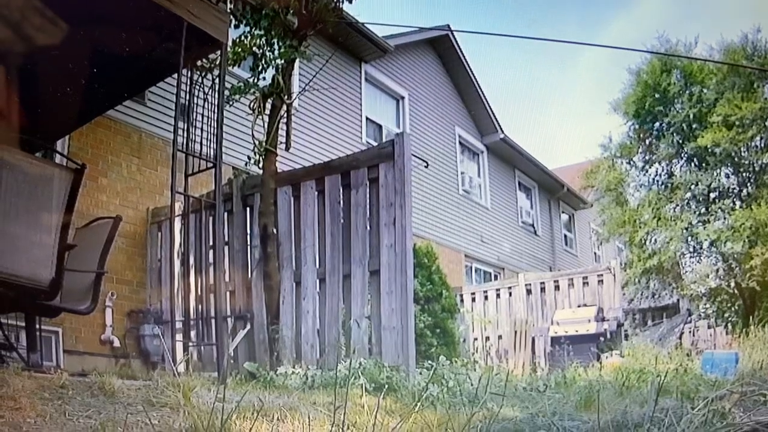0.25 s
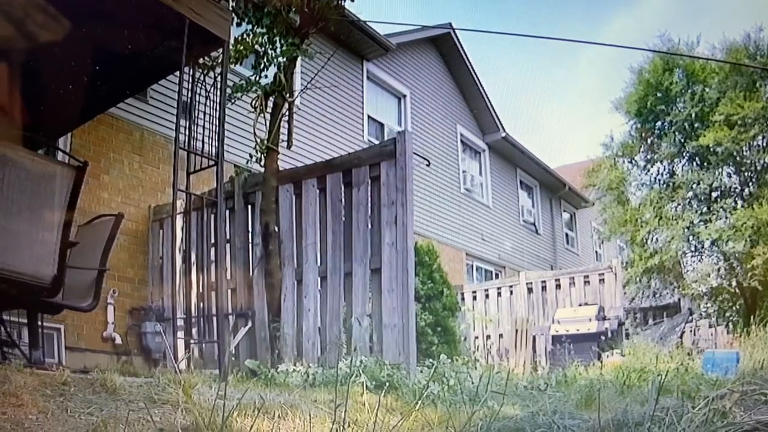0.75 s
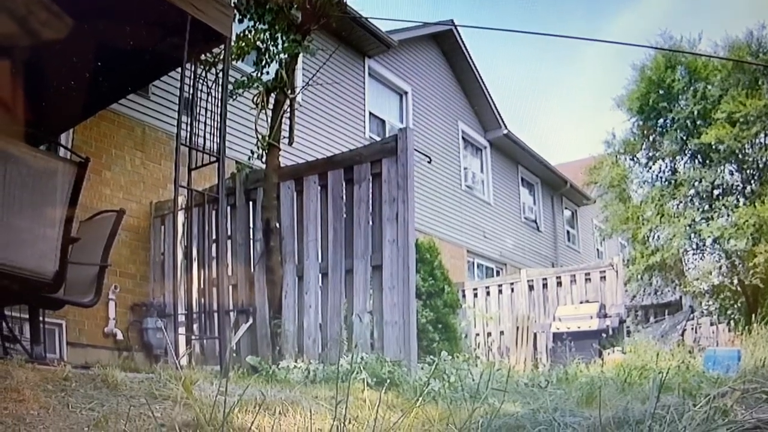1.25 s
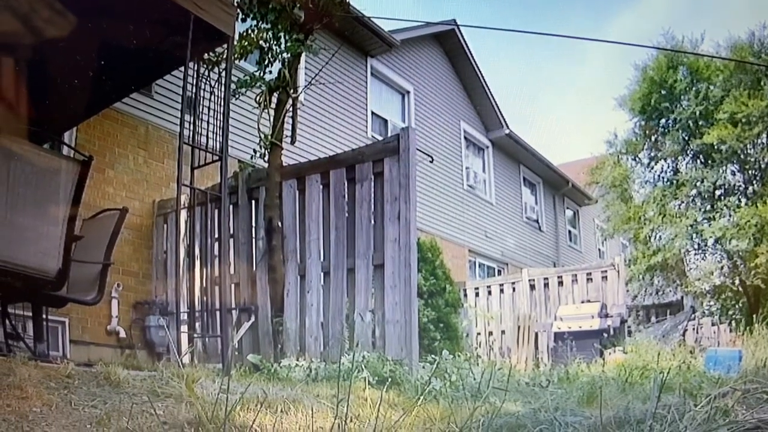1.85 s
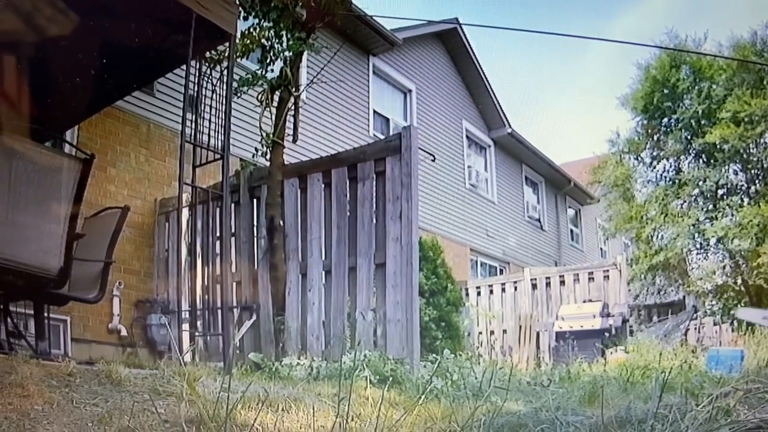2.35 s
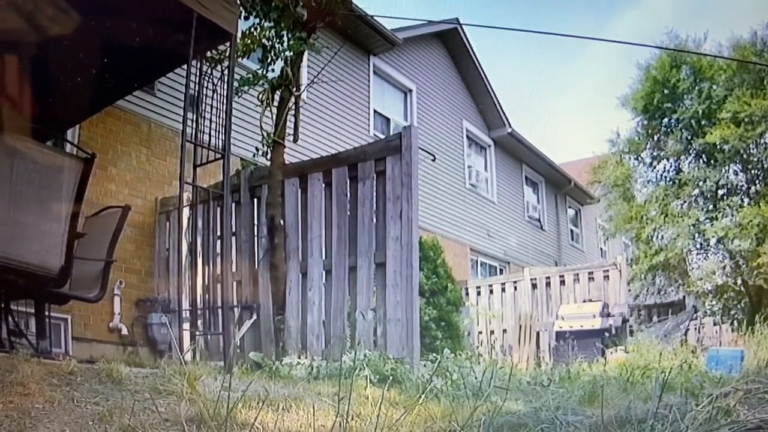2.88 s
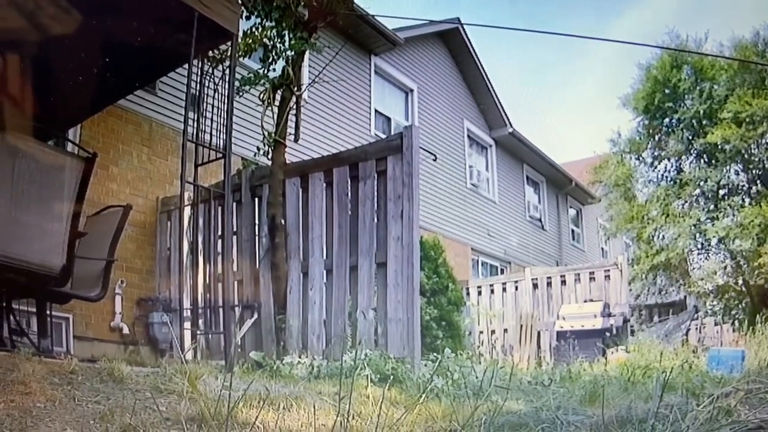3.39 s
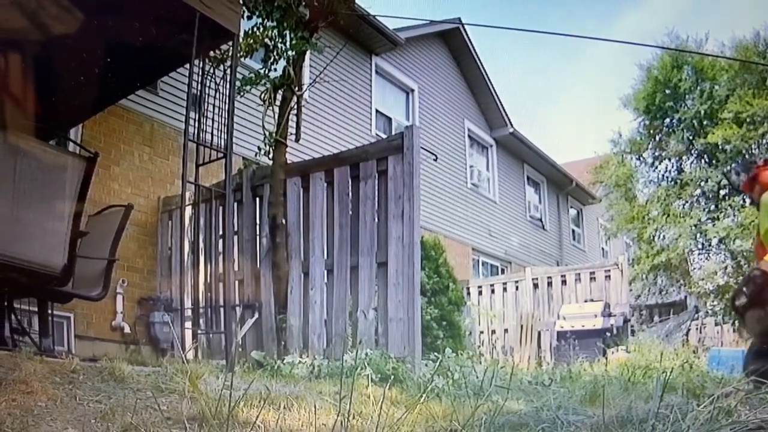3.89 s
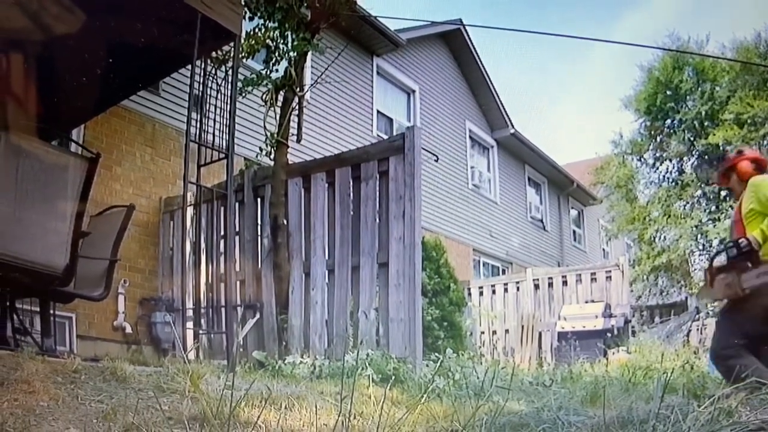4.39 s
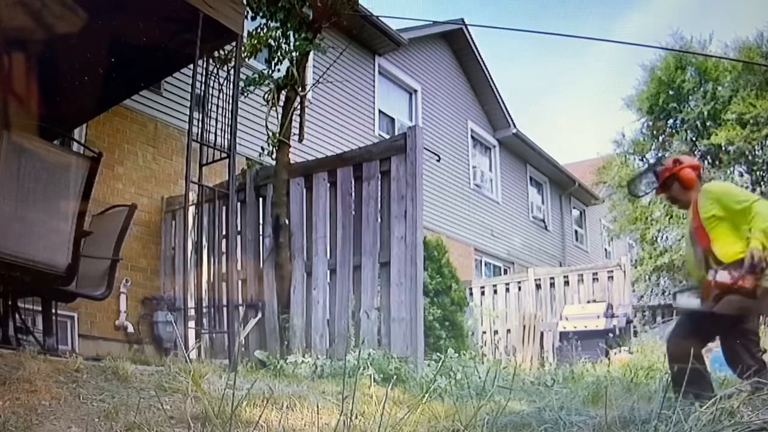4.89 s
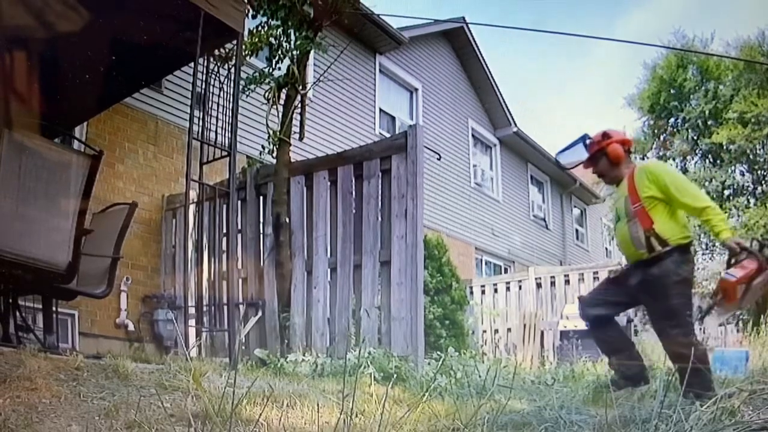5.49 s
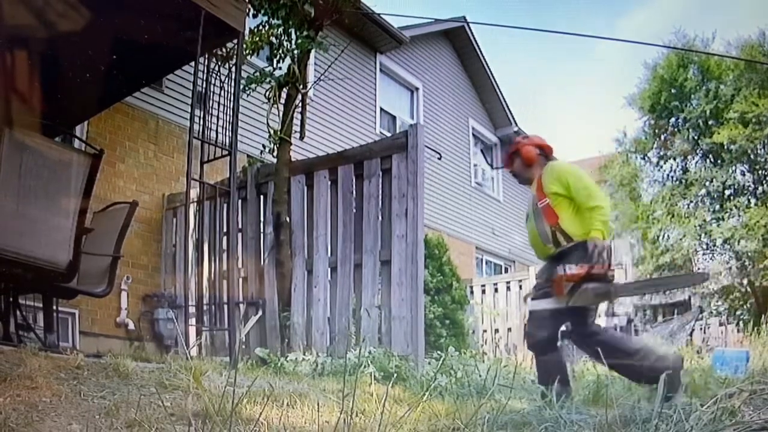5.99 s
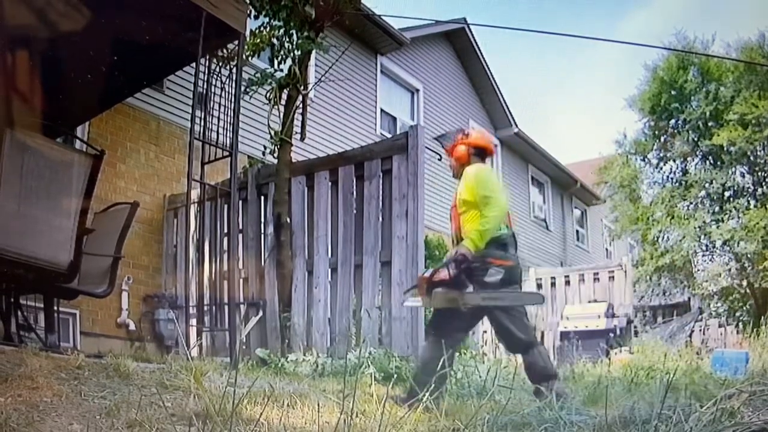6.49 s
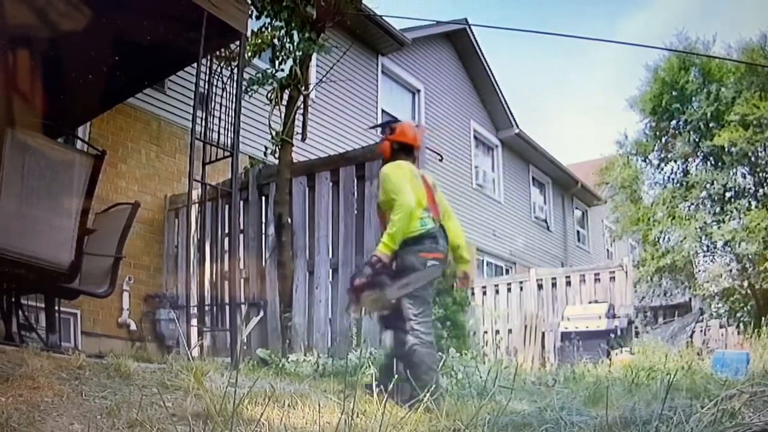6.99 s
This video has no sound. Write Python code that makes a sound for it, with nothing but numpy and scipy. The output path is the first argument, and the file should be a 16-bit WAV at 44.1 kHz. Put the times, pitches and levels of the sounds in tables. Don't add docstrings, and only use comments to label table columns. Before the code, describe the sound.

Stereo, from the ground in a back yard with light wind and a low distant rumble. At 0 s comes a faint puff and a fading thin starter whistle; around 0.37-0.47 s the cord zips and the dead engine puffs hollowly. At about 0.5 s a small two-stroke chainsaw catches, with metallic pings, and putters at roughly 65-70 pulses a second, some turns barking irregularly over hissing clatter. At 2.42 s the throttle opens: a raspy surge peaks near 2.56 s, then a clean tone slides down until about 3.2 s. From 3.1 s it idles slower and quieter, around 61 pulses a second, with uneven pops and dry cracks, its tone shifting as the saw is carried. Soft wind thumps touch the microphones near 4.6, 5.3 and 5.8 s. From 5.7 s a loose cover rattles and short pings follow harder cracks. Fences and walls echo briefly; idle continues to 7.25 s.

```python
import sys
import numpy as np
from scipy import signal
from scipy.fft import rfft, irfft, next_fast_len
from scipy.io import wavfile
from scipy.ndimage import uniform_filter1d

SR = 44100
rng = np.random.default_rng(int(sys.argv[2]) if len(sys.argv) > 2 else 0)


def transcribe(u):
    v = np.clip(np.atleast_2d(u).T, -1, 1)
    q = np.round(v * 32767).astype(np.int16)
    wavfile.write(sys.argv[1], SR, q)


def boost_factor(decibels):
    exponent = np.asarray(decibels, float) / 20
    return 10 ** exponent


N = 319725
CLOCK_S = np.arange(N) / SR

# time in seconds, speed in turns per second.
SPEED = [(0.47, 54.25), (0.63, 70.8), (1.9, 66), (2.23, 65.3), (2.4, 63.5), (2.43, 70.8), (2.52, 101.5),
         (2.56, 118.5), (2.66, 106.5), (2.84, 88.1), (2.96, 77.5), (3.05, 72.8), (3.26, 66.8), (3.7, 61.2),
         (4.45, 61.6), (4.8, 64.5), (5.5, 61.6), (7.25, 61.4)]
# time in seconds, puff level in dB, muffler facing the listener 0-1,
# outlet in view 0-1.
HOLD = [(0.477, -32, 0.25, 0.56), (0.694, -28.5, 0.18, 0.45), (1.1, -27.5, 0.05, 0.33),
        (1.997, -29.5, 0.18, 0.31), (2.182, -26, 0.51, 0.65), (2.409, -25.5, 0.08, 0.62),
        (2.561, -23, 0.22, 0.89), (2.62, -21, 0.47, 0.96), (3.023, -28.5, 0.36, 0.85),
        (3.609, -32, 0.94, 0.88), (4.17, -35.5, 1, 0.75), (4.71, -34, 0.86, 0.72), (5.26, -34, 0.71, 0.69),
        (5.48, -32.5, 0.62, 0.66), (5.83, -37.5, 0.74, 0.66), (6.16, -35, 0.71, 0.59),
        (6.771, -36, 0.82, 0.17), (7.25, -33.5, 1, 0.23)]
# first burn in seconds, last burn in seconds, turns from burn to burn,
# puff gain in dB.
RUNS = [(.524, .524, 1, 6), (.556, .571, 1, 7), (.587, .587, 1, 0), (.602, .659, 2, 4), (.702, .702, 1, 7),
        (.745, .773, 1, 6), (.816, .816, 1, 9), (.83, .83, 1, 0), (.845, .861, 1, 5),
        (.902, 1.076, 4, 10.5), (1.12, 1.135, 1, 8), (1.193, 1.252, 4, 7), (1.296, 1.531, 4, 10),
        (1.592, 1.592, 1, 5), (1.607, 1.607, 1, 10), (1.651, 1.651, 1, 5), (1.666, 1.666, 1, 7),
        (1.681, 1.681, 1, 0), (1.71, 1.77, 4, 8), (1.785, 1.785, 1, 0), (1.86, 1.89, 2, 6),
        (1.936, 2.027, 3, 7), (2.088, 2.149, 4, 5), (2.241, 2.318, 1, 3), (2.426, 2.426, 1, 3),
        (2.44, 2.531, 1, 3.5), (2.557, 2.557, 1, 0), (2.851, 2.875, 2, 3), (2.909, 2.934, 1, 7),
        (2.96, 2.985, 2, 7), (3.04, 3.04, 1, 4), (3.193, 3.237, 3, 4), (3.313, 3.374, 4, 5),
        (4.113, 4.161, 3, 5), (4.225, 4.29, 4, 5), (4.372, 4.437, 4, 7), (5.402, 5.548, 9, 3),
        (5.679, 5.711, 2, 6), (6.095, 6.127, 2, 7), (6.192, 6.208, 1, 6), (6.432, 6.432, 1, 6),
        (6.543, 6.575, 2, 6), (6.902, 6.902, 1, 4), (6.968, 7.001, 1, 5), (7.068, 7.068, 1, 5)]
# time in seconds, puff gain in dB, gain of the turn before in dB,
# crack level in dB.
HARD_BURNS = [(3.107, 4, 0, -13), (3.437, 2, 2, -16), (3.531, 4, 0, -28), (3.709, 3, 0, -30),
              (3.905, 3, 3, -24), (3.985, 3, 0, -29), (4.033, 6, 0, -20), (4.502, 4, 6, -27),
              (4.567, 7, 0, -21), (4.646, 5, 4, -21.5), (4.74, 10, 0, -21), (4.833, 2, 5, -31),
              (4.91, 5, 6, -29), (5.004, 4, 5, -33), (5.211, 9, 0, -30), (5.307, 10, 0, -30),
              (5.613, 2, 0, -28), (5.826, 9, 0, -27), (5.921, 9, 7, -28), (5.953, 1, 0, -30),
              (6.015, 7, 0, -23), (6.159, 2, 0, -28), (6.29, 5, 4, -28), (6.354, 9, 0, -23),
              (6.64, 9, 7, -20), (6.739, 11, 0, -20), (6.82, 3, 4, -25), (7.085, 0, 0, -27),
              (7.151, 4, 0, -25)]
BLIP_START_S, BLIP_END_S = 2.418, 2.56
AWAY, FACING = 2, 3


def evened(x):
    return x / np.sqrt(np.mean(x ** 2) + 1e-20)


def follow(points, t, **ends):
    return np.interp(t, *np.transpose(points), **ends)


def read(points, hz):
    f, value = np.transpose(points)
    return np.interp(np.log(hz + 1), np.log(f + 1), value)


def low_cut(hz, corner_hz, power):
    return 1 / (1 + (corner_hz / (hz + 1)) ** power)


def high_cut(hz, corner_hz, power):
    return 1 / (1 + (hz / corner_hz) ** power)


def bell(hz, centre_hz, width_hz):
    return 1 / (1 + (2 * (hz - centre_hz) / width_hz) ** 2)


def coloured(x, gain):
    size = next_fast_len(x.shape[-1] + 4096)
    spectrum = rfft(x, size) * gain(np.fft.rfftfreq(size, 1 / SR))
    return irfft(spectrum, size)[..., :x.shape[-1]]


def hiss(gain):
    return evened(coloured(rng.standard_normal(N), gain))


def excite(drive, response):
    return signal.oaconvolve(drive, response)[:N]


def ring(modes):
    hz = abs(np.fft.fftfreq(8192, 1 / SR))
    power = sum(boost_factor(db) ** 2 * (1 / (1 + (2 * (hz - f) / width) ** 2) ** 2) for f, width, db in modes)
    log_gain = np.log(power + 1e-9) / 2
    return np.fft.ifft(np.exp(np.conj(signal.hilbert(log_gain)))).real[:4096]


def clicks(seconds, sizes):
    out = np.zeros(N)
    np.add.at(out, np.clip((seconds * SR).astype(int), 0, N - 1), sizes)
    return out


def patchy(x, patch_db):
    z = signal.stft(x, nperseg=512)[2]
    patches = rng.standard_normal(z.shape)
    for _ in range(2):
        patches = uniform_filter1d(patches, size=4, axis=0)
        patches = uniform_filter1d(patches, size=18, axis=1)
    return signal.istft(z * boost_factor(patch_db * evened(patches)), nperseg=512)[1][:N]


def air(apart=0.43):
    # frequency in Hz, level in dB per Hz.
    air_spectrum = [(12, -11.5), (20, -19.5), (60, -1), (93, -12), (142, -18), (285, -20.5), (1000, -22),
                    (1090, -8), (1220, -25.5), (2460, -28.5), (7950, -50), (8650, -49), (16000, -48)]
    shared = rng.standard_normal(N)
    own = coloured(rng.standard_normal((2, N)), lambda hz: (hz < 7000) * (0.5 + 1.0 * (hz > 90)))
    return boost_factor(-48.5) * evened(coloured(shared + apart * own, lambda hz: boost_factor(read(air_spectrum, hz))))


def gusts(hz=38, spread_s=.014):
    # time in seconds, peak in dB.
    pushes = [
        (4.621, -41),
        (5.27, -46),
        (5.776, -35),
    ]
    s, db = np.transpose(pushes)
    t = np.arange(4000) / SR - .04
    push = np.exp(-.5 * (t / spread_s) ** 2) * np.cos(2 * np.pi * hz * t)
    return excite(clicks(s, boost_factor(db)), push)


def fizz(centre_hz=15350, width_hz=300, flicker_db=3.8):
    # time in seconds, level in dB.
    fizz_level = [(0, -90), (.45, -88), (.5, -74), (2.3, -74), (3.4, -72), (3.7, -84), (7.25, -86)]
    noise = hiss(lambda hz: 1 / (1 + (2 * (hz - centre_hz) / width_hz) ** 4))
    flicker = hiss(lambda hz: hz < 14)
    return noise * boost_factor(follow(fizz_level, CLOCK_S) + flicker_db * flicker)


def surge(t, sag_hz_per_s=45, longest_sag_s=.2):
    runs = []
    for first, last, every, _ in RUNS:
        count = round((last - first) * follow(SPEED, first) / every) + 1
        runs.append(np.linspace(first, last, count))
    burns = np.unique(np.r_[0, np.concatenate(runs), np.transpose(HARD_BURNS)[0], N / SR])
    last = np.searchsorted(burns, t, side="right") - 1
    since, gap = t - burns[last], np.diff(burns)[last]
    return sag_hz_per_s / 2 * since * (gap - since) * (gap < longest_sag_s)


def crank_turns():
    running = CLOCK_S >= SPEED[0][0]
    turns = np.cumsum(follow(SPEED, CLOCK_S) * running) / SR
    s = np.sort(np.r_[np.transpose(RUNS)[:2].ravel(), np.transpose(HARD_BURNS)[0]])
    free = np.interp(s, CLOCK_S, turns)
    whole = np.cumsum(np.round(np.diff(free, prepend=0)))
    hunt = uniform_filter1d(np.interp(CLOCK_S, s, whole - free), size=1500)
    return turns + surge(CLOCK_S) + hunt * running


def crank(lead_s=0.0036, echo_db=-2, spent_db=-2.5):
    turns = crank_turns()
    count = int(turns[-1])
    when = np.interp(np.arange(count), turns, CLOCK_S)
    gain_db, soft = np.zeros(count + 2), []
    for first, last, every, db in RUNS:
        a, b = np.round(np.interp([first, last], CLOCK_S, turns)).astype(int)
        which = np.r_[np.arange(a, b - every // 2, every), b]
        gain_db[which + 1] = db + echo_db
        gain_db[which] = db
        soft.append(when[which])
    s, db, before_db, _ = np.transpose(HARD_BURNS)
    which = np.round(np.interp(s, CLOCK_S, turns)).astype(int)
    gain_db[which + 1] = spent_db
    gain_db[which - 1] = before_db
    gain_db[which] = db
    return when[1:] - lead_s, gain_db[1:count], np.concatenate(soft)


def controls(t):
    s, puff_db, facing, view = np.transpose(HOLD)
    facing = np.clip(np.interp(t, s, facing), 0, 1)
    view = np.clip(np.interp(t, s, view), 0, 1)
    opened = (t > BLIP_START_S) & (t < BLIP_END_S)
    shut, since_s = t >= BLIP_END_S, abs(t - BLIP_END_S)
    opened_puff = opened * (t > BLIP_START_S + .015) * np.clip((BLIP_END_S - t) / 0.1, 0, 1)
    puff_db = np.interp(t, s, puff_db, left=-80) + 2.5 * opened_puff
    puff_db = puff_db - 24 * shut * np.exp(-since_s / 0.12)
    upper_db = -60.5 + 30 * view - 7 * shut * np.exp(-since_s / 0.18) + 8 * opened
    outlet_db = -48.5 + 15.5 * view + 6 * facing + 9.5 * opened
    low_db = -50 - 10 * view
    octaves = np.log2(follow(SPEED, t) / 65.5)
    clatter_db = -41.5 + 6 * facing + 5 * octaves + 6.5 * opened
    return puff_db, upper_db, clatter_db, outlet_db, low_db, facing


def casing(hz, side):
    # frequency in Hz, level in dB per Hz.
    clatter_spectrum = [(800, -14), (1200, -1), (1800, -1), (2500, -5.5), (3100, -4), (4000, -14.5),
                        (4700, -4.5), (6000, -11), (8000, -19.5), (10500, -9.5), (12500, -18.5),
                        (13600, -9), (14500, -36), (16000, -23)]
    # frequency in Hz, width in Hz, level in dB facing away, level in dB facing the listener.
    casing_notes = [(3200, 950, 13, 1.5), (4860, 1300, -3.5, 4.5), (5160, 120, 5.5, 6)]
    notes_db = sum(m[side] * bell(hz, m[0], m[1]) for m in casing_notes)
    return boost_factor(read(clatter_spectrum, hz) + notes_db)


def pulls():
    # time in seconds, peak in dB.
    puffs = [
        (0.004, -35),
        (0.375, -24),
        (0.399, -35),
        (0.446, -28),
    ]
    # time in seconds, level in dB.
    cord_level = [(.37, -90), (.376, -51), (.42, -61), (.46, -54), (.478, -56), (.49, -90)]
    s, db = np.transpose(puffs)
    note = ring([(610, 100, 8.0), (930, 380, -3.5), (1710, 170, -9.5), (3200, 1500, -33.0)])
    cord = hiss(lambda hz: casing(hz, AWAY)) * boost_factor(follow(cord_level, CLOCK_S))
    whistle = evened(excite(rng.standard_normal(N), ring([(3260, 120, 0)])))
    return excite(clicks(s, boost_factor(db)), note / abs(note).max()) + whistle * boost_factor(-52.5 - 150 * CLOCK_S) + cord


def rattle(lag_s=0.002106, uneven_db=3.9):
    # time in seconds, level in dB.
    tap_level = [(5.6, -43), (5.8, -39), (6.04, -34), (6.2, -32), (6.34, -37), (6.6, -35), (7.25, -39)]
    # frequency in Hz, width in Hz, level in dB.
    cover_notes = [(3420, 99, -2.5), (2910, 160, -8)]
    when = crank()[0]
    size = boost_factor(follow(tap_level, when, left=-120) + uneven_db * rng.standard_normal(len(when)))
    note = ring(cover_notes)
    return excite(clicks(when + lag_s, size), note / abs(note).max())


def pings(bend_s=0.0057, rise_s=0.0018):
    # time in seconds, start in Hz, end in Hz, peak in dB, t60 in seconds.
    plate_pings = [(0.549, 960, 922, -29, 0.11), (0.562, 900, 720, -20, 0.14),
                   (0.698, 3200, 3200, -20, 0.054), (5.825, 3200, 3200, -24, 0.045),
                   (5.919, 3340, 2720, -24, 0.052), (6.011, 3470, 2790, -19.5, 0.069),
                   (6.055, 3500, 3200, -15, 0.012), (6.353, 3220, 2760, -22, 0.068),
                   (6.64, 3020, 2810, -18.5, 0.039), (6.737, 4370, 4350, -23, 0.065),
                   (6.931, 4100, 4270, -26, 0.046)]
    t, out = np.arange(3000) / SR, np.zeros(N)
    for s, start_hz, end_hz, db, t60_s in plate_pings:
        hz = end_hz + (start_hz - end_hz) * np.exp(-t / bend_s)
        level = boost_factor(db - 60 * t / t60_s) * (1 - np.exp(-t / rise_s))
        out[int(s * SR):][:len(t)] += level * np.sin(2 * np.pi * np.cumsum(hz) / SR)
    return out


def clatter(gate=0.9, grains_per_s=900, grain_db=5.0):
    # time in seconds, side shown 0-1.
    roll = [(.5, 0), (1.1, 0), (2.0, 0), (2.6, 0.45), (3.0, 0.18), (3.6, 0.3), (4.2, 1), (4.7, 0.62),
            (5.3, 0.75), (5.7, 0.83), (6.1, 0.65), (6.5, 0.55), (6.9, 0.68), (7.25, 0.3)]
    when, gain_db, _ = crank()
    swell = excite(clicks(when, boost_factor(0.12 * gain_db)), np.exp(-np.arange(900) / SR / 0.021))
    ticks = boost_factor(grain_db * np.minimum(rng.exponential(1, N), 4)) * (rng.random(N) < grains_per_s / SR)
    ticks = evened(ticks) * rng.choice([-1., 1.], N)
    drive = (1 + gate * swell) * (rng.standard_normal(N) + .5 * ticks)
    level = boost_factor(controls(CLOCK_S)[2] + 0.32) * np.clip((CLOCK_S - HOLD[0][0]) / 0.005, 0, 1)
    away = coloured(drive, lambda hz: casing(hz, AWAY))
    toward = coloured(drive, lambda hz: casing(hz, FACING))
    shake = 0.2 * hiss(lambda hz: hz < 9)
    facing = np.clip(follow(roll, CLOCK_S) + shake, 0, 1)
    mixed = evened(patchy((1 - facing) * away + facing * toward, 1.8))
    dull = coloured(mixed, lambda hz: high_cut(hz, 13000, 24))
    whirr = np.clip((follow(SPEED, CLOCK_S) - 61) / 14, .08, 1)
    whirr *= (CLOCK_S < BLIP_START_S + .03) | (CLOCK_S > BLIP_END_S + .03)
    return level * (dull + whirr * (mixed - dull))


def coasting():
    # frequency in Hz, level in dB.
    pipe_colour = [(250, -47), (370, -22), (470, 2), (600, 0), (760, -7), (920, 1), (1200, -12),
                   (1700, -11)]
    # time in seconds, level in dB.
    coast_level = [(2.43, -55), (2.45, -29), (2.545, -29), (2.57, -20), (2.7, -24), (2.85, -29),
                   (2.92, -36), (3.2, -49), (3.45, -55)]
    turns = crank_turns()
    hum = sum(np.sin(2 * np.pi * (order * turns + rng.random())) for order in range(3, 23))
    hum = evened(coloured(hum, lambda hz: boost_factor(read(pipe_colour, hz))))
    return hum * boost_factor(follow(coast_level, CLOCK_S, left=-120, right=-120))


def cracks(rise_s=.0003, fall_s=.003, tail_s=.014, soft_db=-63):
    # time in seconds, crack level in dB.
    spits = [(.702, -49), (.816, -53), (1.018, -39), (1.193, -52), (1.312, -41), (1.371, -40),
             (1.431, -31.5), (1.664, -31), (1.77, -30), (2.041, -31), (2.101, -29), (3.374, -31),
             (3.563, -35), (3.775, -29), (3.839, -27.5), (4.338, -35), (4.956, -37), (5.081, -32.5),
             (6.224, -32.5), (6.445, -33), (6.882, -33), (6.934, -37)]
    # frequency in Hz, level in dB.
    crack_spectrum = [(300, -37), (700, 9), (1700, 2), (3200, -2), (4600, -5.5), (6500, -7), (8000, -12),
                      (11000, -8), (16000, -21)]
    when, _, soft = crank()
    hard = [(row[0], row[-1]) for row in HARD_BURNS]
    s, crack_db = np.transpose(hard + list(spits) + [(s, soft_db) for s in soft])
    shadow_db = -8.0 * (1 - controls(s)[-1])
    bursts = clicks(s - .0028, boost_factor(crack_db + 5.0 + shadow_db))
    blip = when[(when > BLIP_START_S) & (when < BLIP_END_S)]
    rasps = clicks(blip - .001, boost_factor(-26))
    t = np.arange(1500) / SR
    shape = 2 * (1 - np.exp(-t / rise_s)) * (0.38 * np.exp(-t / fall_s) + 0.17 * np.exp(-t / tail_s))
    noise = hiss(lambda hz: boost_factor(read(crack_spectrum, hz)))
    front = hiss(lambda hz: hz ** 2 / (hz ** 2 + 7000 ** 2) * high_cut(hz, 13000, 6))
    sparks = uniform_filter1d(1. * (rng.random(N) < 500 / SR), size=10) * 10
    noise = evened(patchy(noise, 1.5) * (1 + 1.1 * sparks))
    burst = noise * excite(bursts, shape) + 0.15 * front * excite(bursts, np.exp(-t / 0.00053))
    rasp = coloured(noise * excite(rasps, shape), lambda hz: low_cut(hz, 1300, 6))
    return rasp + coloured(burst, lambda hz: low_cut(hz, 380, 6))


def bark(hz, spread_s):
    t = np.arange(400) / SR - .0035
    blow = np.exp(-.5 * (t / spread_s) ** 2) * np.sin(2 * np.pi * hz * t)
    return blow / np.linalg.norm(blow)


def turbulent(note, puffs, flat, unevenness, rough=.2, detune=.01):
    swirl = np.exp(-np.arange(600) / SR / 0.012)
    eddies = excite(puffs, swirl / np.linalg.norm(swirl)) * rng.standard_normal(N) * unevenness
    drive = 20 * (puffs + rough * eddies) / np.linalg.norm(note)
    steps, out = np.arange(len(note)), 0
    for share, way in ((flat, -1), (1 - flat, 1)):
        bent = np.interp(steps * (1 + way * detune), steps, note)
        out = out + excite(drive * np.sqrt(share), bent)
    return out


def exhaust(uneven_db=1.3, jitter_s=.0002, soft_db=4):
    # frequency in Hz, width in Hz, level in dB facing away, level in dB facing the listener.
    muffler = [(406, 9.7, -25, -56), (458, 122, -40, -4), (508.9, 38.6, 12.5, 2.5), (618.6, 40, -23, 1.5),
               (651, 96, 7, -27), (721.5, 83, 0, -3), (900.7, 79, -3, -9)]
    # frequency in Hz, width in Hz, level in dB.
    upper_notes = [(1174, 194, 9.5), (1663, 76, 13.5), (1817, 177, 3), (2250, 200, -1)]
    # delay in seconds, gain facing away, gain facing the listener.
    afterpuffs = [(.0048, 0.47, 0.6), (.0088, 0.11, 0.55)]
    # time in seconds, low to high 0-1.
    outlet_bend = [(.5, 0.95), (2.4, 0.41), (3.0, 0.4), (3.6, 0.14), (3.9, 0.45), (4.4, 0.15), (4.9, 0.62),
                   (5.25, 0.37), (5.5, 0.2), (6.2, 0.41), (7.25, 0.06)]
    # time in seconds, unevenness factor.
    roughness = [(.47, .55), (2.1, .55), (2.25, .4), (2.42, .3), (2.6, .25), (3.0, .4), (3.5, .48),
                 (5, .52), (7.25, .75)]
    when, gain_db, _ = crank()
    chance = rng.standard_normal((len(when), 7)) * follow(roughness, when)[:, None]
    when = when + jitter_s * chance[:, 0]
    puff_db, upper_db, _, outlet_db, low_db, facing = controls(when)
    when = when + .003 * (1 - facing)
    puff = boost_factor(puff_db + uneven_db * chance[:, 1])
    idle = puff * boost_factor(np.minimum(gain_db, soft_db))
    burn = puff * boost_factor(gain_db) - idle
    upper = boost_factor(upper_db + 0.88 * gain_db + uneven_db * chance[:, 2])
    away, toward = clicks(when, idle * (1 - facing)), clicks(when, idle * facing)
    for k, (delay_s, gain_away, gain_toward) in enumerate(afterpuffs):
        late = when + delay_s + 2 * jitter_s * chance[:, 3 + k]
        size = idle * boost_factor(2 * uneven_db * chance[:, 5 + k])
        away = away + clicks(late, size * gain_away * (1 - facing))
        toward = toward + clicks(late, size * gain_toward * facing)
    far = [(ring([(f, width, db) for f, width, db, _ in muffler]), away),
           (bark(615, 0.0025), clicks(when, 1.12 * burn * (1 - facing)))]
    near = [(ring([(f, width, db) for f, width, _, db in muffler]), toward),
            (ring(upper_notes), clicks(when, upper)),
            (bark(280, 0.0026) + 0.89 * bark(710, 0.0066), clicks(when, 0.22 * burn * facing)),
            (bark(720, 0.001), clicks(when, 0.33 * puff * boost_factor(gain_db) * facing))]
    bend = np.clip(follow(outlet_bend, when), .01, .99)
    steady = [([(895.8, 49, 0)], outlet_db + 10 * np.log10(1 - bend)),
              ([(951.0, 53.4, 1.1)], outlet_db + 10 * np.log10(bend)),
              ([(253, 50, -19.5), (301.0, 36, -1.0)], low_db)]
    for modes, db in steady:
        near.append((ring(modes), clicks(when, idle / puff * boost_factor(db + chance[:, 2]))))
    flat = np.clip(.5 + 0.48 * hiss(lambda hz: hz < 8), 0, 1)
    unevenness = follow(roughness, CLOCK_S)
    far_sound = sum(turbulent(note, puffs, flat, unevenness) for note, puffs in far)
    near_sound = sum(turbulent(note, puffs, flat, unevenness) for note, puffs in near)
    far_sound = coloured(far_sound, lambda hz: low_cut(hz, 455, 10))
    return far_sound + coloured(near_sound, lambda hz: low_cut(hz, 240, 8))


def yard(x):
    # frequency in Hz, t60 in seconds.
    decay = [(200, 0.14), (1000, 0.62), (4000, 0.16), (12000, 0.025)]
    taps = np.zeros((2, SR // 2))
    at = np.arange(200, SR // 2 - 20, 20) + rng.integers(0, 20, (2, (SR // 2 - 201) // 20))
    np.put_along_axis(taps, at, rng.choice([-1., 1.], at.shape), 1)
    hz, t, z = signal.stft(taps, SR, nperseg=256)
    tail = signal.istft(z * boost_factor(-60 * t / read(decay, hz)[:, None]), SR, nperseg=256)[1]
    return signal.fftconvolve(x[None], tail / np.linalg.norm(tail[0]), axes=1)[:, :N]


def yard_width(hz):
    middle = 0.9 * low_cut(hz, 3000, 4) * high_cut(hz, 6800, 24)
    return 0.4 + 0.3 * low_cut(hz, 800, 4) + middle - 0.25 * low_cut(hz, 7000, 24)


def scene():
    saw = exhaust() + coasting() + clatter() + cracks() + pings() + pulls() + rattle()
    ground = clicks(np.array([0, .0052]), np.array([1, .15]))[:500]
    tail = yard(saw) * boost_factor(-18)
    apart = coloured(tail[1], yard_width) * [[1], [-1]]
    return excite(saw, ground) + tail[0] + apart + air() + gusts() + fizz()


def ports(hz):
    # frequency in Hz, width in Hz, level in dB.
    dips = [(1090, 85, -21), (1375, 80, -18), (2460, 210, -21), (3660, 70, -15), (3760, 70, -13),
            (4880, 90, -14), (5490, 110, -18), (7320, 150, -14), (4450, 160, 6), (5110, 60, 7),
            (7780, 250, 7), (10400, 250, -7), (10800, 260, 10), (9450, 300, -3), (14700, 700, -7),
            (15350, 300, 4)]
    # frequency in Hz, lead of the right in radians, excess of the left in dB.
    pair = [(150, 0, .5), (300, -.6, .5), (1000, -1, 2.7), (1700, -.55, -.3), (3100, -1, 2), (4000, .4, 3),
            (4600, -.5, 4), (5300, -3, 8), (5700, -6, -2), (6200, -7.3, 1), (6800, -6.28, 0)]
    dips_db = sum(db * bell(hz, f, width) for f, width, db in dips)
    f, lead, balance_db = np.transpose(pair)
    lead, balance_db = np.interp(hz, f, lead), np.interp(hz, f, balance_db)
    spacing = 2 * np.pi * np.maximum(hz - 7050, 0) / 4150
    lead = lead + spacing - .47 * np.sin(2 * spacing)
    sides = np.array([boost_factor(balance_db / 2), boost_factor(-balance_db / 2) * np.exp(1j * lead)])
    return boost_factor(dips_db) * high_cut(hz, 15700, 80) * sides


def top_cut(x):
    return signal.sosfilt(signal.butter(12, 16580, fs=SR, output="sos"), x)


def record(dry):
    return top_cut(coloured(dry, ports))


dry = scene()
out = record(dry)
transcribe(out)
```